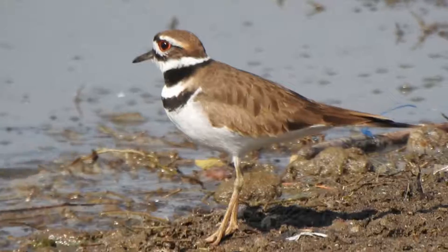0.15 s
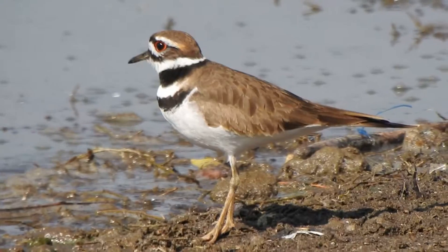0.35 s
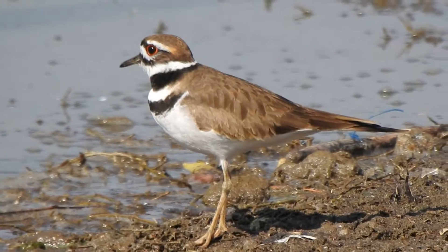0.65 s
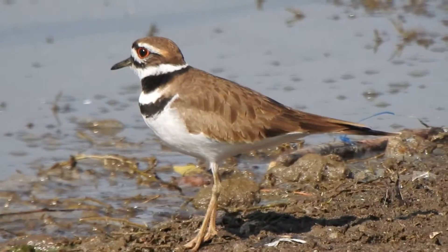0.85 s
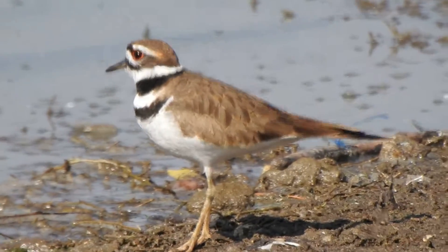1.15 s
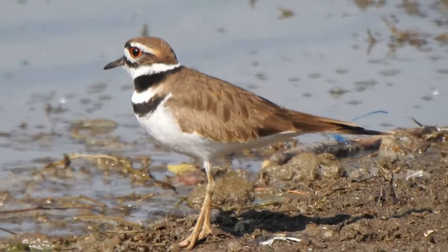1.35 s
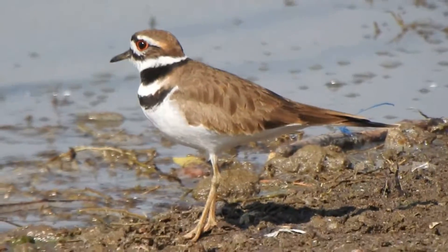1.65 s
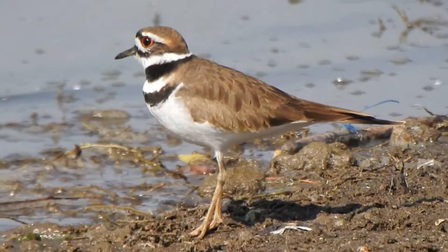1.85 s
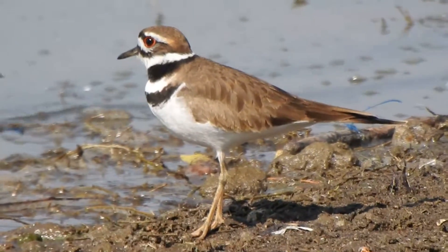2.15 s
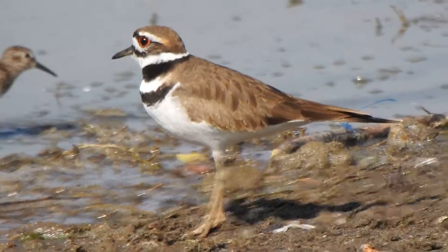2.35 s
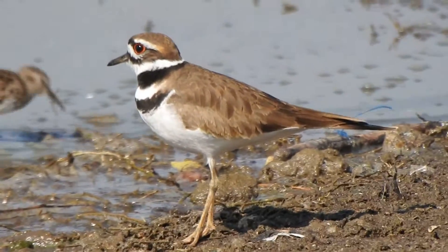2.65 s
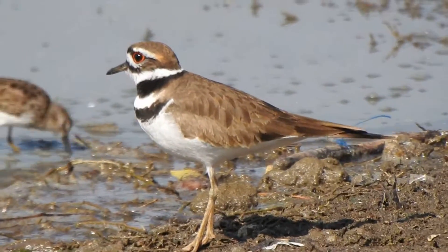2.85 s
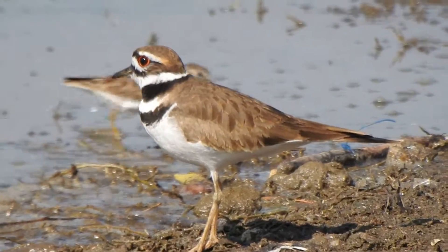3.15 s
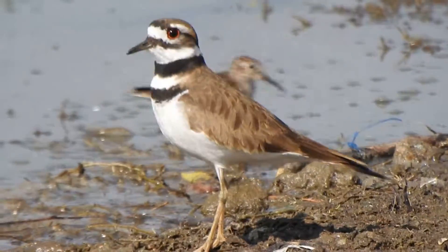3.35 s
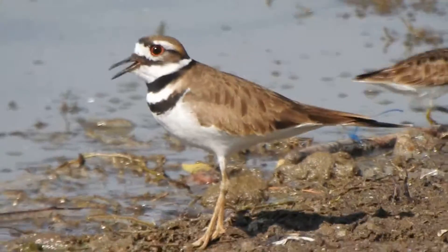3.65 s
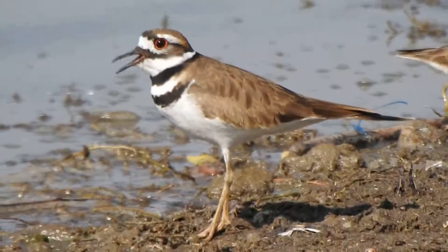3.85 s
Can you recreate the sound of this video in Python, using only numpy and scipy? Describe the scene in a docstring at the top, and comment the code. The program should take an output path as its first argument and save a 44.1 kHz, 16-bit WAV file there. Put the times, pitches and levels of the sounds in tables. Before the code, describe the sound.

Bird calls on an open muddy shore, in stereo: quick small peeps, then steady yapping chirps about five a second, slowing slightly, a tiny wet splash, and finally a clear close rising whistle over low wind.

```python
"""A low wind rumble and small shorebirds peeping near and far open the scene, after a brief silence.
From a muddy shore, a wader left of the stereo microphone yaps rising chirps built of shimmering partials.
Warbles wobble as they fall, one wet splash bursts as noise, and a close plover ends on a long rising whistle.
The peeps are bent near-sine whistles, wind and hiss are banded noise, and the banks return a thin noise-tail echo."""
import sys
import numpy as np
from scipy import signal
from scipy.fft import rfft, irfft
from scipy.io import wavfile
from scipy.ndimage import uniform_filter1d

SR = 44100
rng = np.random.default_rng(int(sys.argv[2]) if len(sys.argv) > 2 else 0)


def ratio(d):
    """dB to gain"""
    e = np.asarray(d, float) / 20
    return 10 ** e


def put_to_file(sound):
    """Save the sound as 16-bit audio at rate SR, in the file named by the first command-line argument."""
    columns = np.atleast_2d(sound).T  # one column per channel
    safe = np.clip(columns, -1, 1)
    whole_steps = np.round(safe * 32767)
    wavfile.write(sys.argv[1], SR, whole_steps.astype(np.int16))


N = 176400  # samples, 4 s

# Wind and hiss spectrum, relative levels: pitch_hz, level_db (per Hz)
AIR_SPECTRUM = [(18, -38), (30, -27.5), (66, 2), (123, -10.5), (168, 1), (379, -21), (455, -31), (639, -21),
                (747, -31.5), (1400, -28.5), (1910, -34.5), (3150, -31), (3490, -33.5), (3880, -26.5),
                (4660, -20.5), (7860, -46), (15500, -57.5)]
# Stereo width of the air: pitch_hz, side_minus_mid_db
AIR_WIDTH = [(60, -24.5), (380, -15), (1300, -8), (8000, 0.5)]
# Narrow central rumble bands: pitch_hz, width_hz, level_db
RUMBLE_BANDS = [(59.8, 6.5, -41), (78, 19, -41), (582.4, 46, -58)]
# Rise and fall of those rumble bands: time_s, level_db
RUMBLE_GUSTS = [(0, 2), (1.5, -2.5), (2.6, 2), (4, 1.5)]
# Clear peeps of small birds: start_s, length_s, start_hz, middle_hz, end_hz, level_db (peak)
PEEPS = [(0.047, 0.028, 4790, 4500.0, 4200, -39), (0.086, 0.076, 4700, 5860, 5360, -39),
         (0.111, 0.033, 6160, 6540, 6870, -37.5), (0.133, 0.022, 3350, 4500, 5270, -34.5),
         (0.166, 0.023, 5200, 4240, 3560, -32), (0.187, 0.058, 5300, 5600, 5200, -42),
         (0.213, 0.016, 3120, 3970, 4960, -29), (0.229, 0.0072, 4830, 4300, 3480, -35),
         (0.335, 0.055, 3500, 3450, 2550, -40), (0.407, 0.044, 4740, 4890, 3800, -35),
         (0.743, 0.015, 4960, 6130.0, 6450, -41), (0.856, 0.12, 3090, 2880, 2600, -49),
         (0.884, 0.025, 4910, 4900, 5100, -42.5), (0.977, 0.012, 5600, 4720, 4000, -42),
         (1.3, 0.025, 3990, 4370, 3540, -29.5), (1.308, 0.046, 5540, 5870.0, 5170, -40),
         (1.327, 0.0078, 3670, 4420, 4400, -28.5), (1.517, 0.047, 6080, 6500, 6700, -46),
         (1.714, 0.031, 6000, 6470, 6900, -40), (1.736, 0.0094, 3400, 4530, 5320, -30.5),
         (1.757, 0.031, 5160, 4500.0, 3800, -32), (1.811, 0.018, 3460, 4360, 4880, -31.5),
         (1.824, 0.01, 4730, 4040, 3370, -28), (1.872, 0.096, 5670, 6400.0, 6100, -44),
         (2.031, 0.24, 2080, 2120, 2070, -56), (2.063, 0.029, 3950, 4600, 3830, -38),
         (2.082, 0.025, 4950, 4120, 3550, -36.5), (2.142, 0.036, 5070, 5550, 5400, -36),
         (2.417, 0.027, 4930, 5300, 6320, -34.5), (2.504, 0.021, 3740, 4200, 4500, -30.5),
         (2.522, 0.008, 4950, 4340, 3540, -31), (2.549, 0.076, 3490, 3210, 2620, -47.5),
         (3.219, .009, 4700, 4300, 3500, -32), (2.997, 0.03, 4900, 5120, 6800, -37),
         (3.176, 0.013, 3720, 4750, 5170, -30), (3.199, 0.022, 5030, 4320, 4100, -30.5),
         (3.235, 0.029, 3450, 3630, 5070, -34.5), (3.334, 0.018, 6400, 6450, 7190.0, -42),
         (3.404, 0.14, 2150.0, 2060, 2040, -54.5), (3.472, 0.02, 5650, 6180, 6940, -43.5),
         (3.514, 0.038, 5950, 6240, 5520, -47.5)]
# Falling warbles: start_s, length_s, start_hz, end_hz (of the line under the wobble), level_db
TRILLS = [(0.523, 0.083, 4680, 2434, -34), (1.249, 0.056, 4500, 3700, -29.5),
          (2.448, 0.075, 4590, 2670, -28.5), (3.029, 0.085, 4630, 2730, -28.5),
          (3.745, 0.072, 4790, 2550, -30)]
# Wader chirps, the colour shifting from one to the next: start_s, length_s, pitch_hz (plateau),
# level_db of partials 2, 3, 4, 5, 6, tilt_db (partial 3 runs from -0.35 to +0.5 of this)
YAPS = [(0.6614, 0.026, 1179, -38, -17, -13, -16.5, -21.5, -20),
        (0.8376, 0.026, 1181, -33, -24.5, -19.5, -36.5, -28, -34),
        (1.0087, 0.029, 1214, -29, -16.5, -21.5, -17.5, -32, -25),
        (1.184, 0.031, 1214, -28.5, -10.5, -18, -23, -21.5, -1),
        (1.36, 0.034, 1234, -32.5, -15, -12.5, -17, -32, 5),
        (1.5743, 0.034, 1236, -24.5, -25, -15.5, -20.5, -19.5, 10.5),
        (1.772, 0.037, 1224, -28, -22.0, -18.0, -26, -28.5, 1),
        (1.9754, 0.032, 1259, -33.0, -23.0, -15, -18, -26.5, 3),
        (2.1759, 0.032, 1258, -26, -29, -19, -22.5, -35.5, -5),
        (2.3825, 0.03, 1258, -21, -34, -18.5, -28, -27.5, -2),
        (2.663, 0.038, 1246, -21.5, -29, -18, -18.5, -33.5, -2),
        (2.884, 0.036, 1251, -25.5, -32, -19, -20, -35.5, 10.5),
        (3.117, 0.041, 1209, -27, -31, -31, -26.5, -32.5, 9),
        (3.36, 0.042, 1204, -28, -28.5, -25.5, -35, -49, -1),
        (3.6252, 0.037, 1230, -26.5, -24, -22.5, -33.5, -42, 12),
        (3.9368, 0.039, 1231, -26, -34.5, -25, -34.5, -35.5, 2)]
# Wader partials 7-13: level_db (relative to the loudest of partials 2-6)
YAP_UPPER_DB = [-26, -45.5, -33, -43, -49, -52, -54]
# Wader partials 1-6, at the first and at the last chirp: left_minus_right_db
YAP_FIRST_PAN_DB = [3, 11, 4, -3, 11, 2]
YAP_LAST_PAN_DB = [6, 5, 5, 2, 2, 0]
# Wet splashes: time_s (peak), level_db, pitch_hz (band centre)
SPLASHES = [(2.952, -42, 3440)]
# Plover whistle: time_s, pitch_hz (partial 1), partial_2_db, partial_2_left_minus_right_db, partial_3_db
PLOVER = [(3.563, 2100, -53, 10, -52), (3.572, 2298, -19, -2.5, -33), (3.584, 2425, -23.5, 12, -35),
          (3.598, 2300, -20.5, -4, -35), (3.609, 2190, -32, 0, -44), (3.623, 2124, -30, 8, -42.5),
          (3.66, 2140, -27, 6, -39), (3.7, 2190, -45, 21, -48), (3.734, 2223, -40.5, -19, -41),
          (3.78, 2256, -26.5, -7.5, -36), (3.861, 2302, -20.5, -3.5, -35), (3.932, 2322, -21, -2.5, -36),
          (4.0, 2400, -22, 9, -33)]
# Other plover partials: partial, level_db (relative to partial 3's column)
PLOVER_OTHERS = [(1, -14.5), (4, -13), (5, -35), (6, -37)]

BIRD_LAG_MS = 0.026  # plover and small birds reach the left side first
PEEP_PAN_DB = 5.5  # near small birds sit a little left


def walk(rate):
    """Slow random drift, rms about 1.2: levels held 1 / rate s and slewed twice."""
    hold = int(SR / rate)
    steps = np.repeat(rng.standard_normal(N // hold + 1), hold)
    return 1.64 * uniform_filter1d(uniform_filter1d(steps, hold), hold)[:N]


def place(phase, hz, db, pan_db, lag_ms):
    """A partial at the left and right of the microphone: a level split and a small lag."""
    side = np.array([[1.], [-1.]])
    return ratio(db + side * pan_db / 2) * np.sin(phase + side * np.pi * hz * lag_ms / 1000)


def add(out, start, sound):
    """Mix a short sound in at its start in seconds."""
    i = int(start * SR)
    out[:, i:i + sound.shape[1]] += sound[:, :N - i]


def band(hz, width):
    """Noise in a bell-shaped band, rms 1."""
    bell = np.exp(-((np.fft.rfftfreq(N, 1 / SR) - hz) / width) ** 2)
    noise = irfft(rfft(rng.standard_normal(N)) * bell, N)
    return noise / noise.std()


def table_at(table, hz):
    """Read a level table along log frequency."""
    table_hz, table_db = np.array(table).T
    return np.interp(np.log(hz), np.log(table_hz), table_db)


def air():
    """Wind rumble and far hiss: third-octave noise bands that flicker independently, plus gusting bands."""
    wind = 0
    for hz in 40 * 2 ** np.arange(0, 8.7, 1 / 3):
        mid, side = band(hz, hz / 5), band(hz, hz / 5)
        level_db = table_at(AIR_SPECTRUM, hz) + 10 * np.log10(hz)
        level_db = level_db + 1.7 * walk(14) + 1.5 * walk(3.008) * (hz < 5000)
        side = ratio(table_at(AIR_WIDTH, hz)) * side * np.array([[1], [-1]])
        wind = wind + ratio(level_db) * (mid + side)
    wind = wind / wind.std() * ratio(-36)
    rumble = sum(ratio(db) * band(hz, width) for hz, width, db in RUMBLE_BANDS)
    gust_db = np.interp(np.arange(N) / SR, *np.array(RUMBLE_GUSTS).T)
    return wind + rumble * ratio(gust_db)


def peeps(rows):
    """Near-sine whistles on a curved pitch path, slightly fluttering."""
    quaver_share, steady_s = 0.013, 0.01  # share of pitch; whistles longer than steady_s quaver less
    flutter_db = 2.5  # times the walk
    out, flutter, quaver = np.zeros((2, N)), walk(150), walk(250)
    for start, length, first_hz, middle_hz, last_hz, db, pan_db in rows:
        i = int(start * SR)
        u = np.linspace(0, 1, int(length * SR))
        # parabola through the start, middle and end pitches
        hz = first_hz * (1 - u) * (1 - 2 * u) + 4 * middle_hz * u * (1 - u) + last_hz * u * (2 * u - 1)
        depth = quaver_share * np.sqrt(min(1, steady_s / length))
        hz = hz * (1 + depth * np.resize(quaver[i:], len(u)))
        level_db = db + flutter_db * np.resize(flutter[i:], len(u))
        phase = 2 * np.pi * np.cumsum(hz) / SR
        add(out, start, np.sin(np.pi * u) ** 0.66 * place(phase, hz, level_db, pan_db, BIRD_LAG_MS))
    return out


def far_flock():
    """Distant small birds: many faint peeps at random times, pitches and sides."""
    count = 550
    u, g = rng.random((count, 2)).T, rng.standard_normal((count, 5)).T
    start = u[0] * (N / SR - 0.01)
    length = 0.015 * (0.5 + 2.4 * u[1])
    hz = 4400 * 2 ** (0.6 * np.tanh(g[0]))  # within 0.6 octave of 4400 Hz
    first_hz, last_hz = hz * (1 + 0.07 * g[1]), hz * (1 + 0.1 * g[2])
    level_db, pan_db = -53.5 + 4.5 * g[3], 3 * g[4]
    return peeps(zip(start, length, first_hz, hz, last_hz, level_db, pan_db))


def bank_echo(sound):
    """Thin echo from the banks: convolution with a decaying noise tail after a short gap."""
    t60_s, gap_s, echo_db = 0.4, 0.008, -25
    t = np.arange(SR // 2) / SR
    tail = rng.standard_normal((2, len(t))) * ratio(-60 * t / t60_s) * (t > gap_s)
    tail *= ratio(echo_db) / np.sqrt(np.sum(tail ** 2) / 2)
    return signal.fftconvolve(sound, tail, axes=1)[:, :N]


def trills():
    """One small bird's warble: a falling whistle with a wide fast wobble that dies away."""
    wobble_hz, depth_hz, wait_s, settle_s = 62, 730, 0.0037, 0.033
    fade_db_s, crest_db = -250, 3  # louder at the top of each wobble
    flutter_db, jitter_hz = 2.5, 90  # times the walk
    out = np.zeros((2, N))
    for start, length, first_hz, last_hz, db in TRILLS:
        t = np.arange(int(length * SR)) / SR
        wobble = -np.cos(2 * np.pi * wobble_hz * np.maximum(t - wait_s, t * 0.86))
        hz = first_hz + (last_hz - first_hz) * t / length
        hz = hz + depth_hz * np.exp(-t / settle_s) * wobble + jitter_hz * walk(400)[:len(t)]
        level_db = fade_db_s * t + crest_db * wobble + flutter_db * np.resize(walk(323), len(t))
        env = np.sin(np.pi * t / length) ** 0.21 * ratio(level_db)
        phase = 2 * np.pi * np.cumsum(hz) / SR
        add(out, start, env * place(phase, hz, db, PEEP_PAN_DB, BIRD_LAG_MS))
    return out


def wader():
    """Harmonic chirps: pitch climbs to a plateau, level swells and stops short."""
    lead_s, croak_db, croak_depth = 0.014, -24, 0.07  # faint lead-in, unsteady until the voice locks in
    rise_share, rise_s, attack_s, release_s = 0.17, 0.014, 0.0125, 0.0035  # pitch is this share low at 0 s
    rough_share, shimmer_db, rasp_db = 0.0064, 2.5, 3  # times the walk; partials 8 up are hoarse
    root_db, upper_fade_db_s, lag_ms = -44.5, -16.5, 0.036  # partials 7-13 dim; left side hears 1-6 first
    out, jitter, rasp = np.zeros((2, N)), walk(400), walk(1500)
    shimmer = [walk(90) for _ in range(14)]
    first, last = YAPS[0][0], YAPS[-1][0]
    for start, length, top_hz, *dbs, tilt_db in YAPS:
        i = int((start - lead_s) * SR)
        t = np.arange(int((length + lead_s + 0.0084) * SR)) / SR - lead_s
        now = slice(i, i + len(t))
        hz = top_hz * (1 - rise_share * np.exp(-t / rise_s)) * (1 + rough_share * jitter[now])
        hz *= 1 + croak_depth * rasp[now] / (1 + np.exp(t * 1000))
        phase = 2 * np.pi * np.cumsum(hz) / SR
        croak = ratio(croak_db) * np.clip(1 + t / lead_s, 0, 1)
        swell = 1 / (1 + np.exp(-(t - 0.0045) * 4 / attack_s))
        env = (croak + swell) / (1 + np.exp((t - length) * 2 / release_s))
        late = (start - first) / (last - first)
        upper = [max(dbs) + db + upper_fade_db_s * (start - first) for db in YAP_UPPER_DB]
        for k, db in enumerate([root_db, *dbs, *upper]):
            panned = k < len(YAP_LAST_PAN_DB)
            pan_db = (1 - late) * YAP_FIRST_PAN_DB[k] + late * YAP_LAST_PAN_DB[k] if panned else 0
            level_db = db + shimmer_db * shimmer[k][now]
            if k > 6:
                level_db = level_db + rasp_db * np.roll(rasp, k * 999)[now]
            if k == 2:
                level_db = level_db + tilt_db * (np.clip(t / length, 0.15, 1) - 0.5)
            partial_phase = (k + 1) * phase + rng.uniform(0, 2 * np.pi)
            partial = place(partial_phase, (k + 1) * hz, level_db, pan_db, lag_ms * panned)
            add(out, start - lead_s, env * partial)
    return out


def splashes():
    """Short wet bursts: banded noise under a bell-shaped level."""
    t = np.arange(N) / SR
    return sum(ratio(db) * band(hz, 0.9 * hz) * np.exp(-((t - peak) / 0.014) ** 2)
               for peak, db, hz in SPLASHES)


def plover():
    """A clean stack of partials: a short hump in pitch, then a slow climb."""
    t, (times, *columns) = np.arange(N) / SR, np.array(PLOVER).T
    paths = [uniform_filter1d(np.interp(t, times, column), size=200) for column in columns]
    hz, two_db, pan_db, three_db = paths
    phase = 2 * np.pi * np.cumsum(hz * (1 + 0.00142 * walk(60))) / SR
    out = place(2 * phase, 2 * hz, two_db, pan_db, BIRD_LAG_MS)
    for k, db in [(3, 0.038)] + PLOVER_OTHERS:
        level_db = three_db + db + 1.1 * walk(29.64)
        out += place(round(k) * phase, round(k) * hz, level_db, -4.5, 0)  # a little right
    return out * (t > times[0])


def scene():
    """Birds and splashes with their echo over the air, faded in from silence."""
    near = peeps([(*row, PEEP_PAN_DB) for row in PEEPS])
    shore = near + far_flock() + trills() + wader() + splashes() + plover()
    mix = shore + bank_echo(shore) + air()
    full_s, fade_s = 0.052, 0.0088
    return mix * np.clip((np.arange(N) / SR - full_s) / fade_s + 1, 0, 1) ** 3


def top_cut(x):
    """Nothing passes above the cut-off."""
    return signal.sosfilt(signal.butter(12, 15720, fs=SR, output="sos"), x)


def record(dry):
    """The microphone cuts the deepest bass, below 57.2 Hz."""
    low_cut = signal.butter(4, 57.2, "high", fs=SR, output="sos")
    mix = signal.sosfilt(low_cut, dry)
    return top_cut(mix)


dry = scene()
out = record(dry)
put_to_file(out)
```